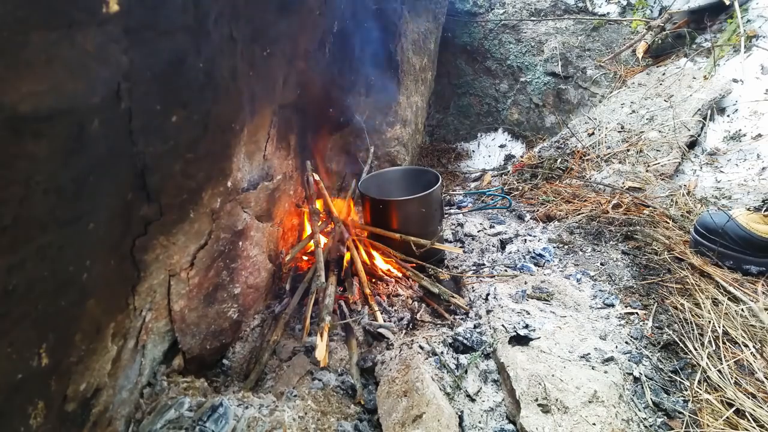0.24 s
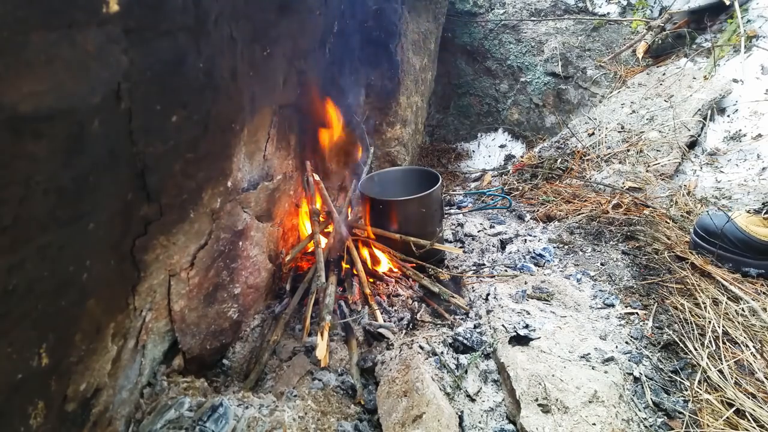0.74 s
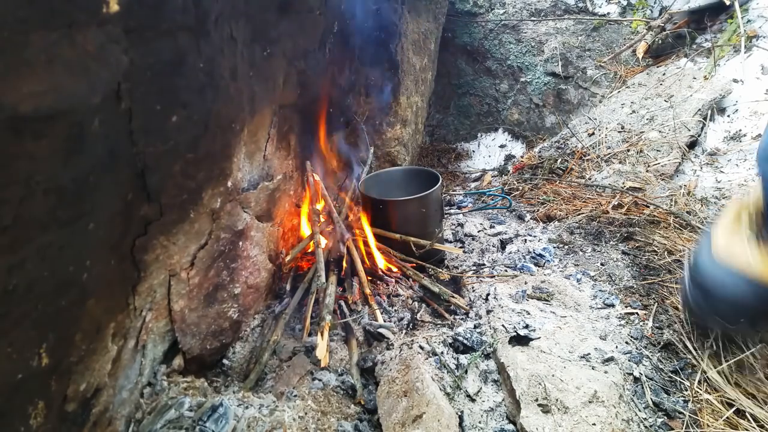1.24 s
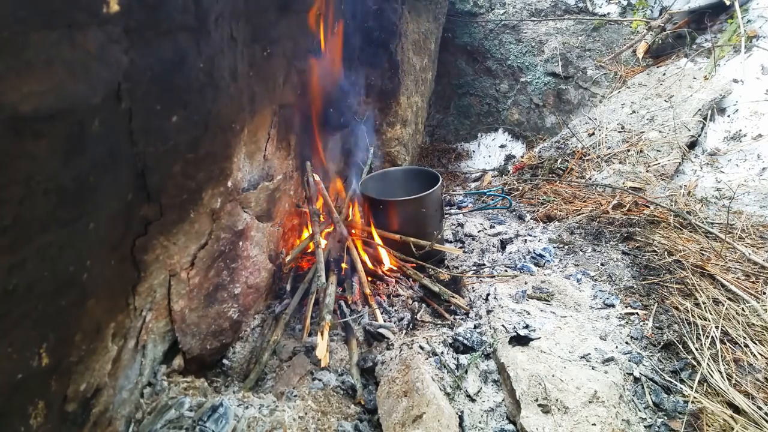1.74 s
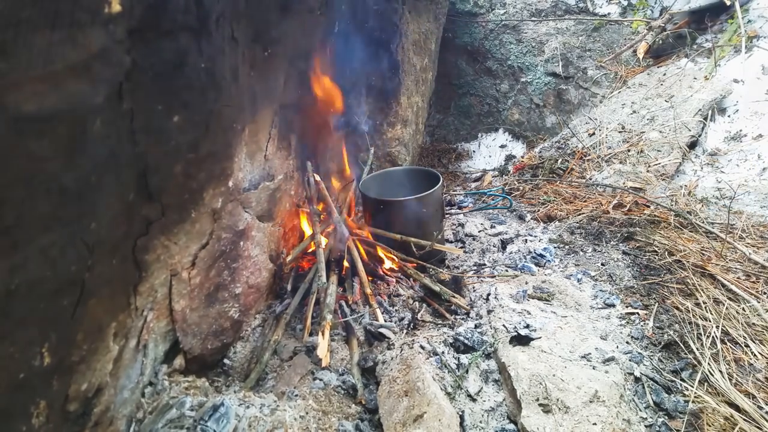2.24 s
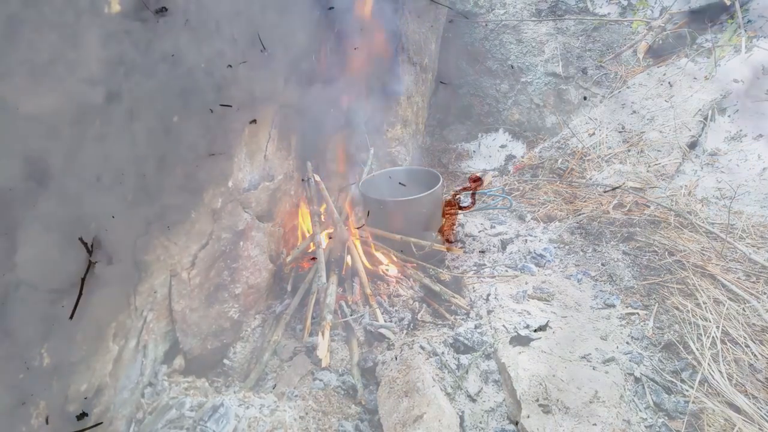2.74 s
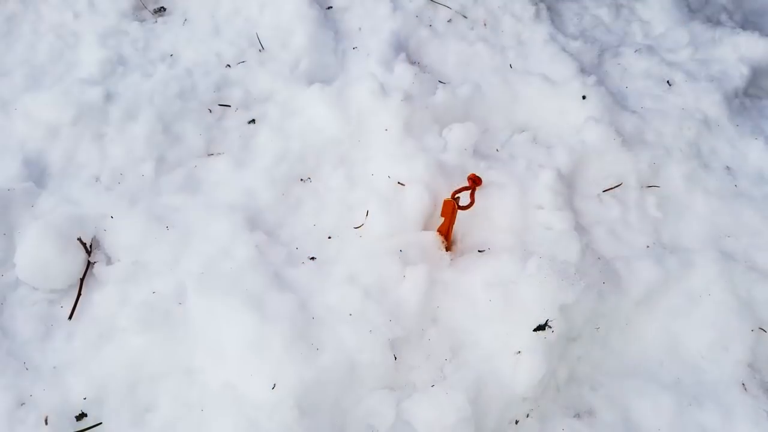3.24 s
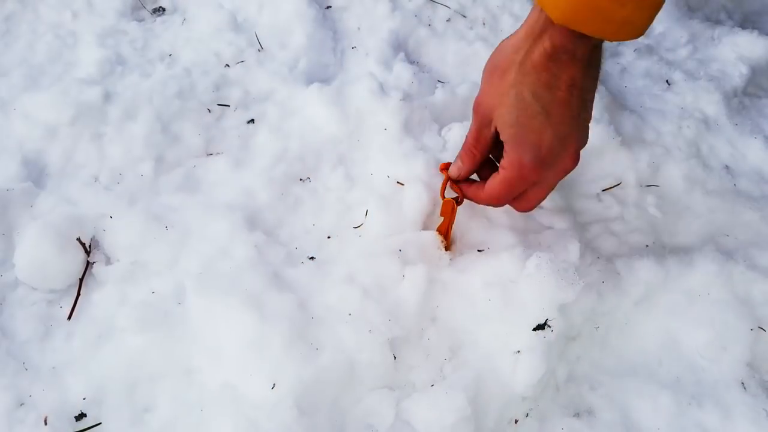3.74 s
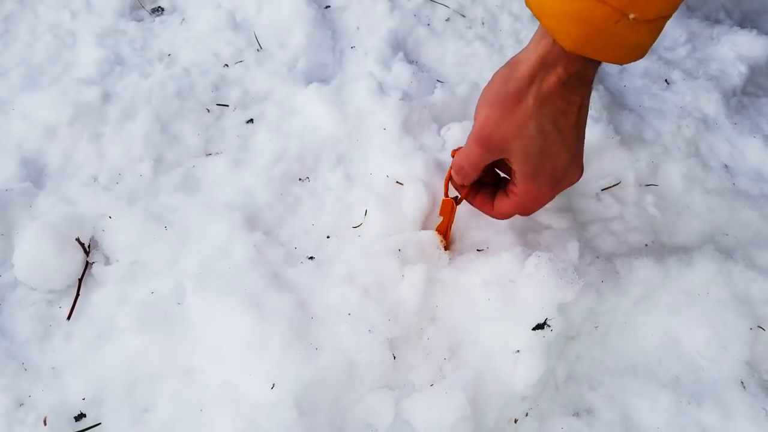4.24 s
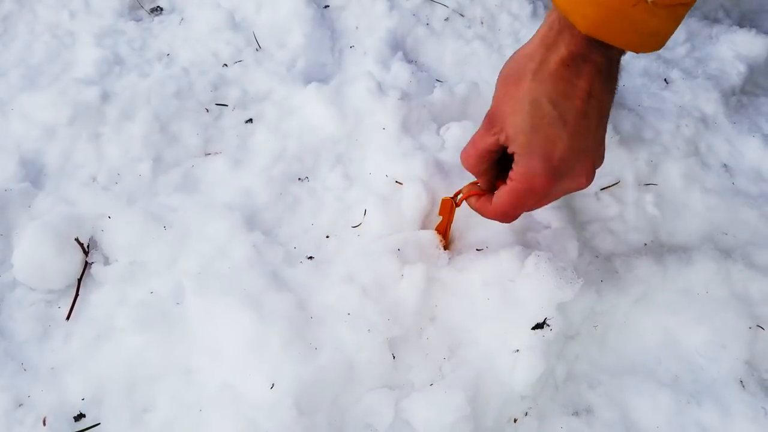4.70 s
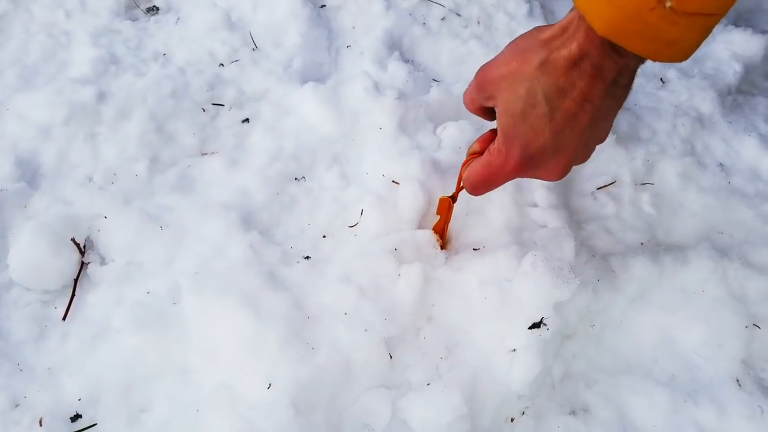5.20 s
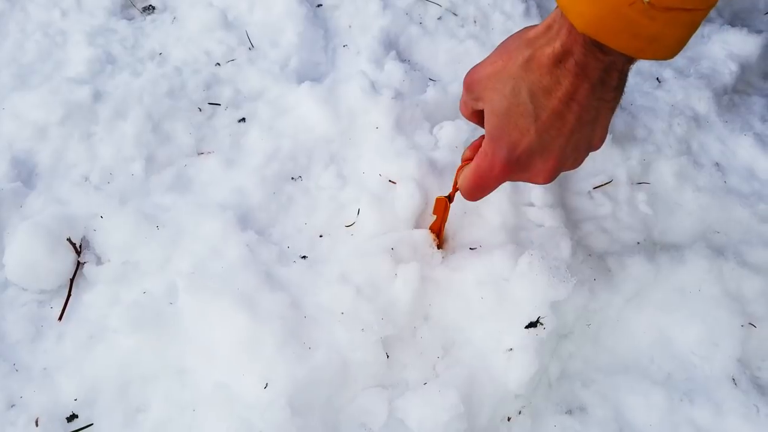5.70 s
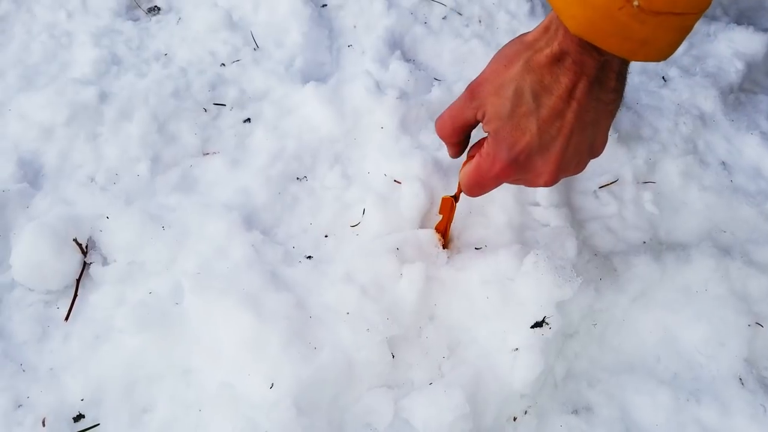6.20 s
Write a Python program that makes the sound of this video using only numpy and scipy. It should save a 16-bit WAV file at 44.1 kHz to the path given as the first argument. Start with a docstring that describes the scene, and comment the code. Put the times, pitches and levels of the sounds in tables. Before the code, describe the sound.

Burning twigs snap and hiss as trouser legs swish, then it turns quiet and a hand crunches snow and tugs a peg.

```python
"""Twig fire, then snow

A small twig fire burns against a rock: flames flutter, steam hisses, sap spits and twigs snap in the
heat. Someone beside it shifts their boots, and their trouser legs brush with a swish. After about
three seconds the fire gives way to a quiet snowfield, where a sleeve rustles and fingers crunch the
crust around a small peg and tug at it. All is heard in stereo from about a metre away."""
import sys
import numpy as np
from scipy import signal
from scipy.fft import rfft, irfft
from scipy.io import wavfile
from scipy.ndimage import uniform_filter1d

SR = 44100
rng = np.random.default_rng(int(sys.argv[2]) if len(sys.argv) > 2 else 0)


def to_wav(s):
    """Save 16-bit WAV."""
    ch = np.atleast_2d(s).T  # columns
    pcm = np.round(np.clip(ch, -1, 1) * 32767)  # PCM
    wavfile.write(sys.argv[1], SR, pcm.astype(np.int16))


N = 284600
T = np.arange(N) / SR
FREQ = np.maximum(np.arange(N // 2 + 1) * SR / N, 1)

# How alike the two microphones hear a noise: f/Hz, correlation (1 = the same)
MIC_LIKENESS = [(120, 1), (300, 0.74), (650, 0.21), (1400, -0.36), (3000, 0.027)]
# The tone of each noise, or how strong its low and high parts are: f/Hz, level/dB
AIR_TONE = [(50, 4), (160, -5.5), (320, -19), (560, -33.5), (770, -16.5), (1100, -25.5), (15500, -36.5)]
SWISH_OUT_TONE = [(250, -23), (800, -4.5), (1400, -6.5), (3000, -5), (4500, -9.5), (5900, -2), (6800, -8.5),
                  (7700, -14.5), (15500, -18)]
SWISH_BACK_TONE = [(250, -13.5), (800, -5), (1300, 2.5), (2400, 7.5), (3900, 0.5), (5700, 5.5), (7700, -7),
                   (15500, -13)]
RUB_TONE = [(300, -8.5), (700, -4.5), (1400, -11), (3600, -5), (5000, -6), (5800, 1), (8000, -2),
            (15000, -0.5)]
NYLON_TONE = [(1200, -47), (2900, -6), (3800, 3.5), (5000, 5.5), (6800, 0), (10000, -1), (13000, 4),
              (15500, -3)]
CLOTH_TONE = [(50, -11), (130, 0.5), (750, 3.5), (1800, -0.5), (2700, -2), (8000, -21.5)]
FLAME_TONE = [(25, -37.5), (50, -1), (90, 1.25), (250, -4.5), (600, -13.5), (3000, -35.5)]
STEAM_TONE = [(200, -16), (600, 2), (2500, -3), (6600, -6), (7600, -18.5), (15500, -20)]
# Trouser legs brushing, twice out and once back: t/s, length/s, level/dB, slope/(dB/s), release/s
LEG_SWISHES = [(1.216, .11, -43.5, 17, 0.14), (1.392, 0.15, -37, -21, 0.11), (2.218, 0.18, -41, 18, 0.032)]
# How much louder the swish is left or right at each pitch: f/Hz, left minus right/dB
SWISH_BALANCE = [(380, 24), (700, -19.5), (1290, 3), (6600, -9.5), (8500, -2.5)]
# Dull bumps of flame, boots and hand: t/s, level/dB, f/Hz, decay/s
BUMPS = [(0.5899, -36, 165, 0.0034), (.861, -43.5, 111, 0.0045), (1.0593, -45, 1670, 0.0026),
         (1.812, -50, 710, 0.056), (1.867, -33.5, 75, 0.021), (2.636, -51, 620, 0.025),
         (2.659, -40, 244, 0.014), (2.774, -39.5, 524, 0.0051), (4.005, -46.5, 87, 0.035),
         (4.007, -41.5, 225, 0.014), (4.034, -46.5, 1100, 0.0057), (5.064, -57.5, 71, 0.033)]
# Fingers sliding along the peg and its cord: t/s, length/s, level/dB
FINGER_SLIDES = [(4.35, 0.49, -67), (4.945, 0.069, -58.5), (5.19, 0.56, -66), (5.78, 0.067, -58.5),
                 (5.97, 0.15, -60), (6.37, 0.096, -64.5)]
# Tugs at the peg: t/s, thump level/dB, thump f/Hz, scrape level/dB
PEG_TUGS = [(5.882, -50, 140, -55), (5.938, -41, 104, -46.5), (5.962, -45, 216, -48),
            (6.061, -42.5, 149, -45)]
# Snow crust and peg ticking under the fingers: t/s, body/dB, snap/dB, icy fizz/dB
CRUST_TICKS = [(3.302, -59, -40, -50), (3.6457, -46, -41.5, -49), (3.6965, -66, -46, -51),
               (3.754, -56, -40, -47), (3.869, -58, -38.5, -45), (3.929, -57, -46.5, -45),
               (4.0003, -57, -34, -42.5), (4.1474, -57, -39, -58), (4.2198, -44, -34, -36),
               (4.2253, -46.5, -37, -42), (4.2503, -46, -40, -41), (4.2612, -51, -37.5, -44),
               (4.3221, -46.5, -43.5, -54), (4.9358, -57.5, -52.5, -48.5), (5.9264, -68, -60, -54)]
# Wrist moves that crease the sleeve: t/s, length/s, level/dB
SLEEVE_CREASES = [(3.67, 0.025, -49.5), (3.77, 0.12, -48.5), (3.96, 0.14, -54), (4.16, 0.18, -49)]
# Beads of sap bursting: t/s, level/dB
SAP_SPITS = [(0.024, -52.5), (0.335, -52.5), (0.4457, -55.5), (0.4695, -68), (1.462, -49), (1.6675, -54),
             (1.686, -55), (1.9098, -51.5), (2.468, -53), (2.5584, -51), (2.8779, -53.5)]
# Sap whistling out of a twig: t/s, length/s, level/dB, f/Hz
SAP_WHISTLES = [(0.427, 0.11, -67.5, 5200), (0.791, 0.04, -55.5, 4380), (1.724, 0.16, -61, 2430),
                (1.727, 0.2, -62, 1700)]
# Damp wood letting out extra steam: t/s, length/s, level/dB
STEAM_PUFFS = [(2.04, 0.817, -52.5), (3.12, 0.086, -53)]
# Twigs snapping: t/s, woody body/dB, snap/dB, fizz/dB, snap f/Hz, relative tail/dB, left minus right/dB
TWIG_SNAPS = [(0.2302, -44.5, -38, -39, 3330, -2, 0), (0.5492, -43.5, -41.5, -45, 4180, -5, -4),
              (0.5905, -28.5, -23.5, -32.5, 5600, -14.5, 1.0), (0.7580, -34.5, -24.5, -32, 4850, -17.5, 3),
              (0.8916, -42.5, -43, -53, 5240, -13, 2), (1.1333, -33.5, -31.5, -34.5, 5700, -9.5, 0.5),
              (1.4460, -34.5, -55, -38.5, 4550, -2.5, 0.5), (1.845, -33, -32, -34, 5640, -12, -2),
              (2.015, -42.5, -48.5, -50, 3430, -8, -2), (2.1714, -38, -38.5, -42, 3580, -5.5, 0),
              (2.332, -50, -37.5, -44.5, 3100, -4, -3), (2.3472, -42, -32, -43, 3600, -4, -4),
              (2.421, -35, -33, -32.5, 5700, -0.5, -2), (2.4972, -57, -46, -53, 5970, -9, -11),
              (2.7732, -39.5, -36, -48, 5330, -9, -4), (3.0968, -46, -45.5, -49, 4060, -6, -2),
              (3.204, -37, -40, -38, 5350, -4, 2), (3.216, -40, -60, -65, 3500, -1, 2)]

CRUNCH_HZ, SPIT_HZ = 5020, 4300
POP_WINDOW_S = 0.006  # a pop's level is its energy spread over this time


def amp(db):
    """Turn decibels into a factor to multiply by."""
    return 10 ** (np.asarray(db) / 20)


def over_hz(points):
    """Join (Hz, value) points into a curve, giving each octave equal room."""
    hz, value = np.transpose(points)
    return np.interp(np.log(FREQ), np.log(hz), value)


def panned(x, db):
    """Make the left side db louder than the right."""
    return x * amp(np.array([[db], [-db]]) / 2)


def ring(x, hz, width_hz):
    """Let x ring around one pitch; a narrower width gives a clearer note."""
    return signal.lfilter(*signal.iirpeak(hz, hz / min(width_hz, .4 * SR), fs=SR), x)


def level(x, db=0, seconds=N / SR):
    """Scale x so that its energy, spread over the given time, has this level."""
    return x * amp(db) / np.sqrt(np.mean(np.sum(x ** 2, axis=-1)) / (seconds * SR))


def add(out, start_s, x):
    """Mix x into out from the given time."""
    k = int(start_s * SR)
    out[:, k:k + x.shape[1]] += x[:, :N - k]


def walk(rate):
    """A smooth random wander that heads for a new value rate times a second."""
    hold = int(SR / rate)
    steps = np.repeat(rng.standard_normal(N // hold + 1), hold)
    return uniform_filter1d(uniform_filter1d(steps, hold), hold)[:N]


def stroke(start_s, length_s, db, attack_s, release_s, slope=0):
    """Loudness of one event: rise 20 dB per attack_s, drift by slope dB/s, fall 20 dB per release_s."""
    t = T - start_s
    outside = np.maximum(-t, 0) / attack_s + np.maximum(t - length_s, 0) / release_s
    return amp(db + slope * np.clip(t, 0, length_s) - 20 * np.minimum(outside, 10))


def strokes(table, attack_s, release_s):
    """Joint loudness of several events, given as rows of t/s, length/s, level/dB."""
    return np.sqrt(sum(stroke(*row, attack_s, release_s) ** 2 for row in table))


def grains(rate, spread_db):
    """Tiny random bursts of very unequal size, about rate a second."""
    hits = rng.random(N) < rate / SR
    sizes = hits * amp(spread_db * np.minimum(rng.exponential(size=N), 4))
    fades = signal.lfilter([1], [1, -.85], sizes)
    return level(fades * rng.standard_normal((2, N)))


def texture(tone, rate, spread_db, grain_db):
    """Grainy stereo noise with the given tone; the bass is alike on both sides."""
    noise = rng.standard_normal((2, N)) + amp(grain_db) * grains(rate, spread_db)
    mid, side = rfft(noise) * amp(over_hz(tone))
    alike = np.clip(over_hz(MIC_LIKENESS), -1, 1)
    mid, side = mid * np.sqrt(1 + alike), side * np.sqrt(1 - alike)
    return level(irfft([mid + side, mid - side], N))


def fractures(table, burst_s, tail_s, body_hz, snap_width_hz, fizz_hz):
    """Each break is a pressure pulse and a flurry of tiny tears, then sound scattered by the ground."""
    out, t = np.zeros((2, N)), T[:SR // 20]
    splinter_lag = int(0.00021 * SR)
    for start_s, body_db, snap_db, fizz_db, snap_hz, tail_db, pan_db in table:
        tears, scatter = rng.standard_normal((2, 2, len(t)))
        since_arrival = t - rng.random((2, 1)) * .0002  # reaches each microphone a moment apart
        pulse = level((since_arrival >= 0) * np.exp(-np.abs(since_arrival) / .00004))
        tears = level(tears * np.exp(-t / burst_s))
        scatter = level(scatter * np.exp(-t / tail_s), tail_db + 8.5)
        blow = pulse + tears + scatter
        body = level(ring(ring(blow, body_hz, 5100), body_hz, 4800)) + level(ring(blow, 240, 520), -1.5)
        # the splinter rings just after the break, at a pitch set by its size
        kick = np.roll(pulse + scatter, splinter_lag, axis=1)
        snap = ring(ring(kick, snap_hz, snap_width_hz), snap_hz, 3800)
        fizz = ring(ring(tears + scatter, fizz_hz, 7000), fizz_hz, 14000)
        parts = (body, body_db), (snap, snap_db), (fizz, fizz_db)
        crack = sum(level(x, db, POP_WINDOW_S) for x, db in parts)
        add(out, start_s, panned(crack, pan_db))
    return out


def air():
    """A faint outdoor rumble and thin hiss, with a light breeze mostly on the left microphone."""
    rumble = texture(AIR_TONE, rate=310, spread_db=2, grain_db=-12) * amp(-67 + walk(3.5))
    buffeting = ring(ring(rng.standard_normal((2, N)), 76, 56), 55, 90)
    breeze = level(buffeting * amp(2.4 * walk(4.9)), -70)
    return rumble + panned(breeze, 7.9)


def trousers(swish, tone):
    """Threads catch and slip over each other as a leg moves."""
    start_s, length_s, db, slope, release_s = swish
    threads = texture(tone, rate=960, spread_db=3, grain_db=-8) * amp(1.9 * walk(70))
    balance = amp(np.outer([1, -1], over_hz(SWISH_BALANCE)) / 2)
    movement = stroke(start_s, length_s, db, attack_s=0.093, release_s=release_s, slope=slope)
    return movement * level(irfft(rfft(threads) * balance, N))


def thuds(table, hardness):
    """A soft push and a short crumble make a dull bump; more hardness lets more treble through."""
    out, t = np.zeros((2, N)), T[:SR // 5]
    for start_s, db, hz, decay_s in table:
        noise = rng.standard_normal(len(t)) + 0.19 * rng.standard_normal((2, len(t)))
        crumble = noise * np.exp(-t / decay_s)
        push = np.exp(-t * hz * 5)
        blow = level(ring(crumble, hz, 0.44 * hz)) + level(ring(push, hz, .5 * hz), -1.5)
        add(out, start_s, level(ring(blow, hz, hardness * hz), db, decay_s))
    return out


def hand(scrape_s=0.011, thump_decay_s=0.02):
    """Fingers rub the cord in small uneven slips; each tug scrapes the peg and thumps the snow."""
    slide = strokes(FINGER_SLIDES, attack_s=0.12, release_s=0.12)
    scrape = strokes([(s, scrape_s, db) for s, _, _, db in PEG_TUGS], attack_s=0.0093, release_s=0.018)
    rub = texture(RUB_TONE, rate=540, spread_db=-1, grain_db=-3.5) * amp(2.06 * walk(23))
    thumps = thuds([(s, db, hz, thump_decay_s) for s, db, hz, _ in PEG_TUGS], hardness=3.9)
    return np.hypot(slide, scrape) * rub + thumps


def crust(tail_db=-6, pan_db=0):
    """The snow crust breaks in small ticks around the peg, straight ahead."""
    breaks = [(*tick, CRUNCH_HZ, tail_db, pan_db) for tick in CRUST_TICKS]
    return fractures(breaks, burst_s=0.0008, tail_s=0.0035,
                     body_hz=1160, snap_width_hz=1500, fizz_hz=12500)


def sleeve(reach_s=3.234, length_s=0.33):
    """A sleeve swishes forward, then creases with each wrist move as snow crumbles under the fingers."""
    # the arm shoots out and slows: the nylon hiss drops quickly, the low rustle lingers
    nylon = stroke(reach_s, length_s, db=-33.5, attack_s=0.0089, release_s=0.66, slope=-43)
    cloth = stroke(reach_s, length_s, db=-46, attack_s=0.0095, release_s=0.33, slope=-9)
    crease = strokes(SLEEVE_CREASES, attack_s=0.08, release_s=0.045)
    hiss = texture(NYLON_TONE, rate=2100, spread_db=-1.5, grain_db=2.5)
    grit = amp(4.2 * walk(150))
    folds = texture(CLOTH_TONE, rate=600, spread_db=1, grain_db=-5)
    crumbs = grains(rate=150, spread_db=4.5)
    crunch = level(ring(ring(crumbs, CRUNCH_HZ, 2800), CRUNCH_HZ, CRUNCH_HZ), -5)
    rustle = np.hypot(nylon, crease * grit) * hiss + np.hypot(cloth, amp(-6.5) * crease) * folds
    return rustle + crease * crunch


def gas_jet():
    """Gas escapes from a split twig, losing pressure, and its flame flutters with a hollow note."""
    flutter = level(ring(ring(rng.standard_normal(N), 317, 130), 370, 200))
    pressure = stroke(start_s=.775, length_s=0.07, db=-44, attack_s=0.02, release_s=0.038, slope=-95.5)
    return pressure * panned(flutter, 2.1)


def whistle(hz):
    """Gas blows through a small vent, making a breathy note whose pitch wavers."""
    width_hz = 0.17 * hz
    note = ring(ring(rng.standard_normal((2, N)), hz, width_hz), hz, width_hz)
    wavering_time = T + np.cumsum(0.025 * walk(22)) / SR  # running fast or slow bends the pitch
    return level(np.array([np.interp(wavering_time, T, side, period=N / SR) for side in note]))


def spit_ring(x):
    """Give x the broad, bright tone of bursting sap."""
    return ring(ring(x, SPIT_HZ, 6000), SPIT_HZ, 9000)


def sizzle(spit_decay_s=0.0036):
    """Sap boils out of the twigs: beads burst with a tick and narrow cracks whistle."""
    spits, t = np.zeros((2, N)), T[:SR // 20]
    for start_s, db in SAP_SPITS:
        burst = rng.standard_normal((2, len(t))) * np.exp(-t / spit_decay_s)
        add(spits, start_s, level(spit_ring(burst), db, POP_WINDOW_S))
    whistles = sum(whistle(hz) * stroke(start_s, length_s, db, attack_s=0.044, release_s=0.12)
                   for start_s, length_s, db, hz in SAP_WHISTLES)
    return spits + whistles


def fire(growth_db_per_s=1.28, drying_db_per_s=-1):
    """Flames puff and grow as the fire catches; damp wood hisses and crackles, less as it dries."""
    burning = stroke(start_s=0, length_s=3.216, db=0, attack_s=1, release_s=0.11)
    flame = burning * amp(-54 + growth_db_per_s * T)
    surges = strokes(STEAM_PUFFS, attack_s=0.1, release_s=0.045)
    steam = np.hypot(burning * amp(-57 + drying_db_per_s * T), surges)
    rumble = texture(FLAME_TONE, rate=90, spread_db=-0.5, grain_db=-0.5) * amp(4.55 * walk(21.85))
    hiss = texture(STEAM_TONE, rate=260, spread_db=4.5, grain_db=-9.5) * amp(1.2 * walk(42))
    # steam finds small vents in the wood that slowly widen and narrow
    vents = sum(level(whistle(hz) * amp(2.1 * np.tanh(walk(0.77)))) for hz in (2100, 3200, 5700))
    crackle = level(spit_ring(grains(rate=34, spread_db=8.5)))
    return flame * rumble + steam * (hiss + amp(-17.5) * vents + amp(-9.5) * crackle)


def twigs():
    """Twigs snap in the heat, each with its own share of thump, ring and fizz."""
    return fractures(TWIG_SNAPS, burst_s=0.00067, tail_s=0.0043,
                     body_hz=1260, snap_width_hz=1700, fizz_hz=11500)


def scene():
    """Add up all the sources in the open air."""
    legs = sum(map(trousers, LEG_SWISHES, (SWISH_OUT_TONE, SWISH_OUT_TONE, SWISH_BACK_TONE)))
    campfire = twigs() + fire() + sizzle() + gas_jet()
    bumps = thuds(BUMPS, hardness=2.3)
    snowfield = sleeve() + crust() + hand()
    return air() + legs + bumps + snowfield + campfire


def record(dry, bottom_hz=30, top_hz=15950):
    """The microphones lose the deepest bass and the highest treble."""
    bass_cut = signal.butter(2, bottom_hz, "high", fs=SR, output="sos")
    treble_cut = signal.ellip(10, .1, 70, top_hz, fs=SR, output="sos")
    return signal.sosfilt(treble_cut, signal.sosfilt(bass_cut, dry))


dry = scene()
out = record(dry)
to_wav(out)
```